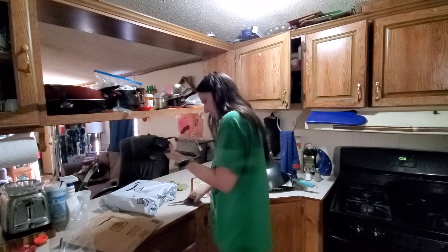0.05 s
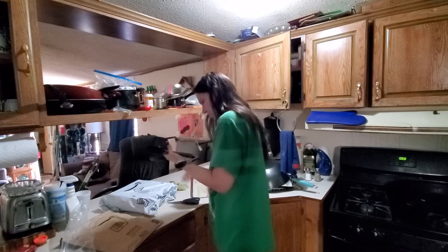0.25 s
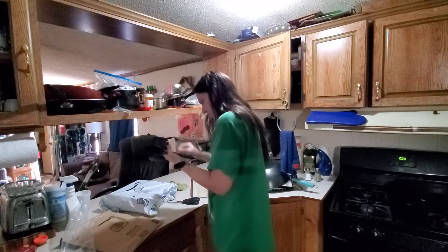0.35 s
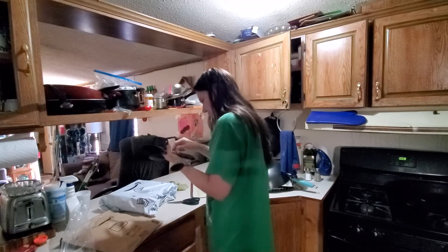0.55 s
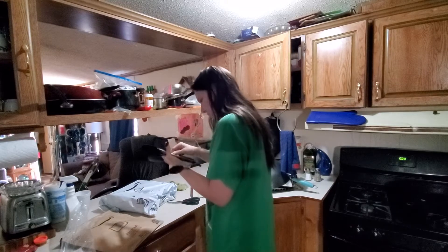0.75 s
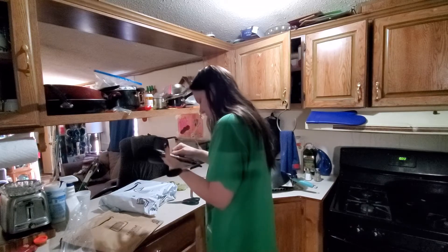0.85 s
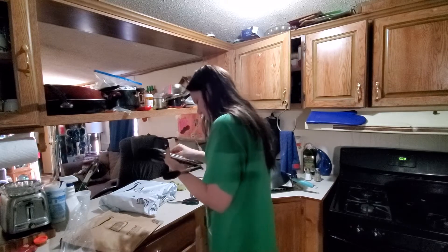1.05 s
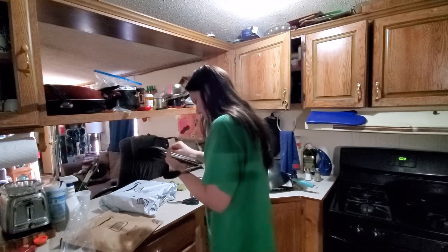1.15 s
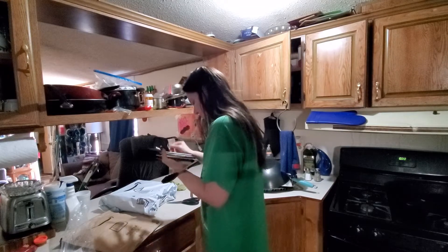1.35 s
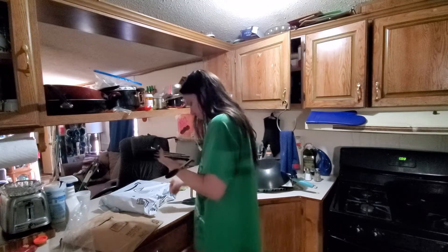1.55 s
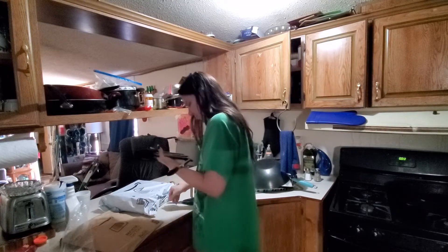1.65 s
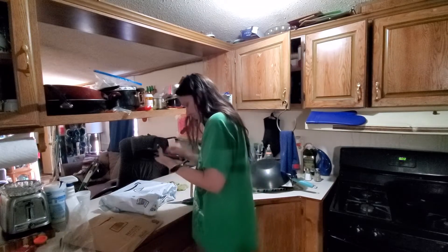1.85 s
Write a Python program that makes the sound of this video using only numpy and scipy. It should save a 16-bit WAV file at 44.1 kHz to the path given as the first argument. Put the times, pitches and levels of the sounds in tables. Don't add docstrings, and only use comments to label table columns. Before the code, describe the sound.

Steel tongs knock and snap on a countertop, rattle to rest, then light ticks over fridge hum.

```python
import sys
import numpy as np
from scipy import signal
from scipy.io import wavfile
from scipy.ndimage import uniform_filter1d

SR = 44100
rng = np.random.default_rng(int(sys.argv[2]) if len(sys.argv) > 2 else 0)


def boost(x):
    u = np.asarray(x, float) / 20
    return 10 ** u


def unload_wav(signal):
    wavfile.write(
        sys.argv[1],
        SR,
        np.round(np.clip(np.atleast_2d(signal).T, -1, 1) * 32767).astype(np.int16),
    )


N = 83790

# [t/s, level/dB, ring f/Hz, ring level/dB, chatter/s]
BLOWS = [
    (.198, -22, 1587, -2, 0.009),
    (.2225, -12.5, 4302, -16.5, 0.0045),
    (.229, -14, 4200, -10.5, 0.0046),
    (.236, -16.5, 4110, -12, 0.005),
    (.2975, -19, 2342, -12, 0.005),
    (.307, -19, 1920, -22, 0.012),
    (.3686, -33.5, 2780, 6, 0.0091),
    (.400, -39.5, 2422, -7, 0.013),
]
# [f/Hz, level/dB]
BLOW_CRACK = [(200, -16.5), (400, -13), (1000, -5), (2000, -7), (4250, -5), (6500, -10.5), (9000, -22.5),
              (16500, -24)]


def blows():
    places, crack = np.zeros((3, N)), colour(BLOW_CRACK)
    for k, row in enumerate(BLOWS):
        add(places[k % 3], *clack(row, crack, first=0.6, arms_db=-18))
    return places


# [f/Hz, level/dB, t60/s]
ARMS = [(2444, 0, .05), (2586, -4, .08), (3056, -4, .07), (3273, -6, .08), (3440, -7, .07), (4310, -9, .05),
        (5033, -9, .06), (5330, -10, .05), (5935, -11, .05)]
CHATTER_PER_S, CHATTER_SPREAD_DB = 7200, 6
RING_T60_S, ARMS_SPREAD_DB = 0.014, 2.5


def clack(row, crack, first, arms_db):
    start_s, db, hz, ring_db, chatter_s = row
    count = 3000
    t = np.arange(count) / SR
    hits = rng.random(count) < CHATTER_PER_S / SR
    size = rng.exponential(1, count)
    sign = rng.choice([-1, 1], count)
    train = hits * sign * boost(CHATTER_SPREAD_DB * np.minimum(size, 3) - 15)
    train *= np.exp(-(t / chatter_s) ** 2)
    train[0] = first

    arms = np.zeros(9000)
    for arm_hz, arm_db, t60_s in ARMS:
        arms += boost(arm_db + ARMS_SPREAD_DB * rng.standard_normal()) * ring(arm_hz, t60_s)
    body = boost(arms_db) * arms + boost(ring_db) * ring(hz, RING_T60_S)
    body[:len(crack)] += crack
    return start_s, boost(db + 23.5) * signal.fftconvolve(train / np.linalg.norm(train), body)


def ring(hz, t60_s, count=9000):
    t = np.arange(count) / SR
    soft_cycles = 1.9
    x = boost(-60 * t / t60_s) * np.sin(2 * np.pi * hz * t)
    x *= 1 - np.exp(-t * hz / soft_cycles)
    return x / np.linalg.norm(x)


# [t/s, level/dB, f/Hz, t60/s]
THUDS = [(.1995, -20, 1560, 0.02), (.203, -25, 528, 0.041), (.206, -29.5, 365, 0.053),
         (.207, -30.5, 858, 0.034), (.2235, -15, 1677, 0.074), (.2295, -13.5, 924, 0.019),
         (.227, -24.5, 310, 0.1), (.235, -18.5, 2520, .025), (.242, -21, 445, .03), (.243, -20, 1765, .05),
         (.245, -23, 830, .03), (.255, -25, 405, 0.021), (.274, -38.5, 350, .04),
         (.2985, -12, 3040, 0.0173), (.301, -20.5, 338, .06), (.301, -20, 525, .05),
         (.304, -21.5, 1950, .03), (.306, -19, 1200, .03), (.307, -23.5, 980, .03),
         (.312, -20.5, 325, 0.028), (.313, -30, 510, .03), (.321, -22.5, 1505, 0.017),
         (.331, -33.5, 341, 0.1), (.331, -27.5, 1011, .03), (.365, -24, 539, 0.04), (.374, -29, 329, .04),
         (.388, -25, 443.6, 0.12), (.398, -25.5, 1196, 0.084), (.411, -28, 553, 0.064),
         (.414, -26.5, 1165, .04), (.428, -31, 307, 0.066), (.2, -35, 123.6, 0.16), (.232, -28, 141, 0.016),
         (.31, -35.5, 126, 0.056), (.199, -30, 2435, 0.024), (.222, -23, 5950, 0.017),
         (.2255, -27.5, 4158, 0.016), (.2345, -26.5, 4140, 0.017), (.465, -30.5, 474, 0.055),
         (.242, -27, 216.6, 0.1), (.316, -28, 701, 0.0336), (.335, -32.5, 215, 0.035),
         (.435, -30.5, 1253, 0.042), (.46, -31.5, 831.5, 0.1), (.47, -36.5, 2339, 0.11),
         (1.279, -58, 886, 0.015), (1.285, -47.5, 130, .05), (1.318, -66, 130, .05), (1.845, -56, 808, .04)]


def counter_knocks():
    places = np.zeros((3, N))
    for k, row in enumerate(THUDS):
        add(places[k % 3], *thud(*row))
    return places


# [t/s, level/dB]
BOOMS = [
    (.228, -35.5),
    (.262, -24),
    (0.389, -31),
    (1.279, -47),
]


def cabinet_booms():
    x = np.zeros(N)
    for start_s, db in BOOMS:
        add(x, *thud(start_s, db, hz=76, t60_s=0.22))
    return x


def thud(start_s, db, hz, t60_s):
    x = ring(hz, t60_s)
    rise = np.minimum(np.arange(len(x)) / SR / 0.002, 1)
    return start_s, boost(db + 24) * rise * x


# [t/s, level/dB, ring f/Hz, ring level/dB, chatter/s]
CLICKS = [(.1981, -40.5, 12500, -23, 0.0015), (0.2028, -28.5, 11900, -28, .002),
          (0.8448, -73, 4790, -2, 0.0036), (1.016, -72, 2560, 5.5, 0.0016),
          (1.1625, -47.5, 2680, 1.5, 0.003), (1.166, -52.5, 14800, -4.5, 0.003),
          (1.1948, -43.5, 2300, -11, 0.00097), (1.1975, -48.5, 5070, 0.5, .003),
          (1.2045, -51.5, 6100, -9, .002), (1.2195, -57.5, 5840, -16, .001),
          (1.838, -64.5, 7300, -8, 0.002)]
# [f/Hz, level/dB]
TIP_CRACK = [(1700, -37.5), (2300, -8.5), (3300, -6), (4200, -15.5), (5500, -3.5), (9500, -12),
             (13000, -3.5), (16500, -6.5)]


def tip_clicks():
    x, crack = np.zeros(N), colour(TIP_CRACK)
    for row in CLICKS:
        add(x, *clack(row, crack, first=1.6, arms_db=-18))
    return x


# [t/s, level/dB, ring f/Hz, ring level/dB, chatter/s]
TAPS = [
    (1.281, -66, 2290, -9, .002),
    (1.295, -70, 2650, 5, 0.0055),
    (1.316, -66, 2680, 4, 0.0075),
    (1.358, -66, 3260, 3, .006),
    (1.364, -78, 2400, 5, 0.0026),
    (1.384, -71.5, 3090, 8, 0.0064),
    (1.396, -69, 3260, 4, 0.0042),
    (1.8175, -52, 2940, -17.5, 0.0088),
    (1.826, -63.5, 1500, -2.5, 0.0053),
    (1.838, -65.5, 2700, -4, .004),
]
# [f/Hz, level/dB]
DULL_CRACK = [(500, -60), (900, 0), (1500, 2.5), (2500, 1), (3600, -5), (4300, -20), (8000, -34),
              (16500, -41)]


def dull_taps():
    places, crack = np.zeros((3, N)), colour(DULL_CRACK)
    for k, row in enumerate(TAPS):
        add(places[k % 3], *clack(row, crack, first=0.6, arms_db=-34))
    return places


# [t/s, level/dB]
SKID_STROKE = [(.2, -42), (.24, -41), (.29, -25.5), (.34, -29.5), (.385, -32.5), (.42, -31), (.445, -35.5),
               (.48, -47.5)]
SCRAPE_STROKE = [(1.2, -103), (1.28, -76), (1.31, -62), (1.35, -68), (1.39, -63.5), (1.415, -99),
                 (1.451, -100)]
HINGE_STROKE = [(.2, -51.5), (.25, -51), (.3, -51.5), (.35, -53.5), (.42, -81), (.45, -82.5)]
SLEEVE_STROKE = [(1.76, -100), (1.78, -70.5), (1.815, -74.5), (1.825, -63.5), (1.86, -76), (1.9, -89.5)]
HAND_STROKE = [(.165, -92), (.185, -56), (.198, -54), (.2, -100), (1.08, -100), (1.12, -73.5), (1.16, -67),
               (1.17, -100)]
# [f/Hz, level/dB]
SKID = [(200, -7.5), (400, 2), (1200, 8.5), (2500, 5.5), (3500, 1.5), (6000, -25), (9000, -41.5),
        (16500, -41.5)]
STEEL = [(1200, -33), (2200, -8.5), (2700, -4.5), (3400, -3), (4000, -7), (7500, -11.5), (9500, -24.5),
         (16500, -16)]
CLOTH = [(500, -12), (900, -3.5), (2000, -5.5), (3500, -4.5), (5000, -11), (7000, -9), (9500, -23.5),
         (16500, -46)]


def friction():
    skid, cloth = colour(SKID), colour(CLOTH)
    return np.array([
        slips(SCRAPE_STROKE, colour(STEEL), 900) + slips(SKID_STROKE, skid, 1500),
        slips(SLEEVE_STROKE, cloth, 4900) + slips(SKID_STROKE, skid, 1400),
        slips(HAND_STROKE, cloth, 5000) + slips(HINGE_STROKE, colour(TIP_CRACK), 3000)])


def slips(stroke, body, per_s):
    s, db = np.transpose(stroke)
    hits = rng.random(N) < per_s / SR
    kicks = hits * rng.standard_normal(N) * boost(1.6 * np.minimum(rng.exponential(1, N), 3))
    pressure = boost(np.interp(np.arange(N) / SR, s, db, -140, -140))
    return pressure * evened(signal.oaconvolve(kicks, body)[:N])


def colour(points):
    hz = abs(np.fft.fftfreq(4096, 1 / SR))
    points = [(13, points[0][1] - 30)] + list(points)
    log_gain = np.log(boost(read(points, hz)))
    phase = -signal.hilbert(log_gain).imag
    x = np.fft.ifft(np.exp(log_gain + 1j * phase)).real[:2048]
    return x / np.linalg.norm(x)


# [f/Hz, t60/s]
KITCHEN = [(100, 0.82), (400, 0.35), (1500, 0.3), (4000, 0.28), (8000, 0.3), (15000, 0.18)]
EARLY_DB, EARLY_T60_S = 1, 0.06


def kitchen(x):
    taps = np.zeros((2, SR))
    slots = np.arange(100, SR - 16, 16)
    at = slots + rng.integers(0, 16, (2, len(slots)))
    np.put_along_axis(taps, at, rng.choice([-1., 1.], at.shape), 1)
    hz, t, z = signal.stft(taps, SR, nperseg=512)
    decay = boost(-60 * t / read(KITCHEN, hz)[:, None])
    tail = signal.istft(pair(*z, hz) * decay, SR, nperseg=512)[1]
    tail *= 1 + boost(EARLY_DB - 60 * np.arange(tail.shape[1]) / SR / EARLY_T60_S)
    tail[:, :100] = 0
    return signal.fftconvolve(x[None], tail / np.linalg.norm(tail[1]), axes=1)[:, :N]


# [f/Hz, likeness 0..1]
SAME = [(60, 0.95), (200, 0.82), (400, 0.83), (1000, 0.47), (4000, 0.1), (16000, 0.18)]


def pair(a, b, hz):
    same = np.clip(read(SAME, hz), 0, 1)[:, None]
    return np.array([same * a + np.sqrt(1 - same ** 2) * b, a])


def spaced(x):
    return np.array([boost(-0.5) * np.roll(x[0], 20), x[1]])


# [f/Hz, level/dB]
FRIDGE = [(59.2, -71.5), (118.4, -63), (242.2, -61.5), (306.8, -65.5), (403.7, -64), (532.9, -73)]


def fridge():
    x, t = np.zeros(N), np.arange(N) / SR
    for hz, db in FRIDGE:
        drift = uniform_filter1d(rng.standard_normal(N), size=3000)
        waver_db = 1.4 * evened(uniform_filter1d(drift, size=3000))
        x += np.sqrt(2) * boost(db + waver_db) * np.sin(2 * np.pi * (hz * t + rng.random()))
    return x


# [f/Hz, level/dB]
RUMBLE = [(15, -36), (25, 6.5), (64, -3), (201, -12.5), (241, -3.5), (279, -15.5), (401, -7.5), (432, -13),
          (900, -22), (1170, -54.5), (1980, -120)]
HISS = [(530, -31.5), (900, 1.5), (1940, -7), (2530, -16), (3230, -15), (6310, -19), (8980, -30.5),
        (15200, -22.5), (16500, -39)]


def room_tone():
    return air(RUMBLE, -53.5) + air(HISS, -70) + fridge()


def air(points, db):
    frames, hz = N // 512 + 5, np.fft.rfftfreq(2048, 1 / SR)
    a, b, c, d, patches = rng.standard_normal((frames, 1025, 5)).T
    patches = uniform_filter1d(patches, size=14, axis=0)
    patches_db = 1.5 * evened(uniform_filter1d(patches, size=6, axis=1))
    z = pair(a + 1j * b, c + 1j * d, hz) * boost(read(points, hz)[:, None] + patches_db)
    return boost(db) * evened(signal.istft(z, nperseg=2048, noverlap=1536)[1][:, :N])


def evened(x):
    return x / np.sqrt(np.mean(x ** 2) + 1e-20)


def read(points, hz):
    f, value = np.transpose(points)
    return np.interp(np.log(hz + 1), np.log(f + 1), value)


def add(mix, start_s, sound):
    part = mix[round(start_s * SR):][:len(sound)]
    part += sound[:len(part)]


THUD_WET_DB, CLICK_WET_DB, WET_DB = -6.5, 1.66, 0.5


def scene():
    tongs = blows() + dull_taps() + friction()
    knocks, clicks = counter_knocks(), tip_clicks()

    wet = sum(kitchen(place) for place in tongs + boost(THUD_WET_DB) * knocks)
    wet = wet + boost(CLICK_WET_DB) * kitchen(clicks)

    steel = tongs.sum(0) + clicks
    counter = knocks.sum(0) + cabinet_booms()
    left = steel + counter
    right = boost(-8.0) * np.roll(steel, 14) + boost(-2.5) * np.roll(counter, 8)
    return np.array([left, right]) + spaced(boost(WET_DB) * wet + room_tone())


def top_cut(x):
    return signal.sosfilt(signal.butter(12, 16860, fs=SR, output="sos"), x)


def record(dry):
    x = np.tanh(dry)
    lowpass = signal.firwin(255, 15900, window=("kaiser", 4), fs=SR)
    low = signal.oaconvolve(x, lowpass[None], "same")
    leak_db = -25
    return top_cut(low + boost(leak_db) * (x - low))


dry = scene()
out = record(dry)
unload_wav(out)
```